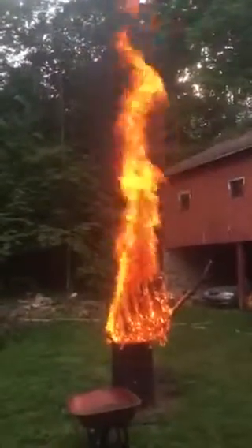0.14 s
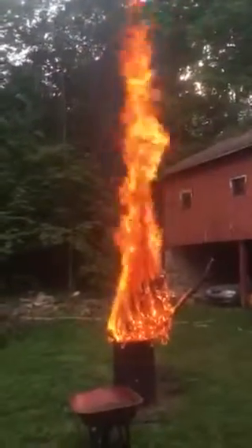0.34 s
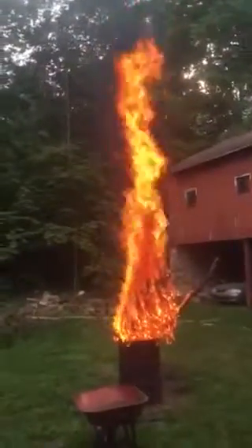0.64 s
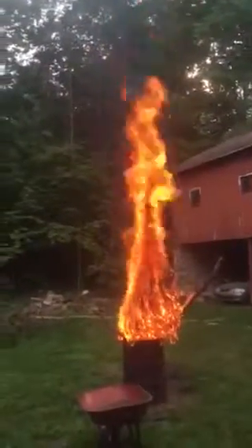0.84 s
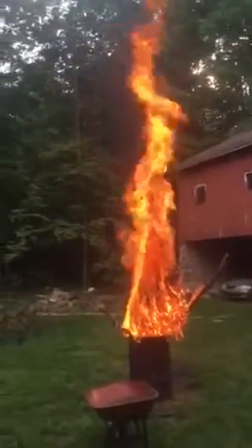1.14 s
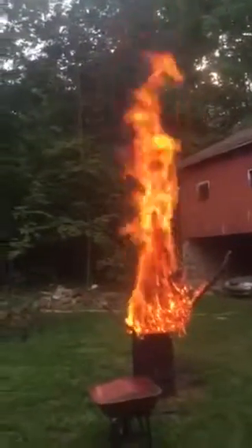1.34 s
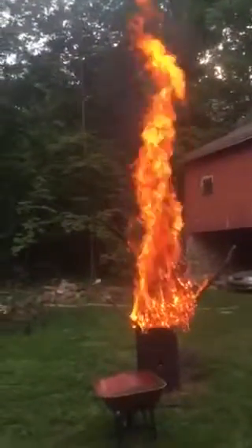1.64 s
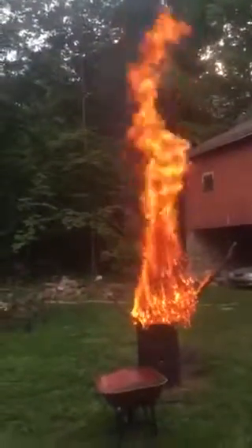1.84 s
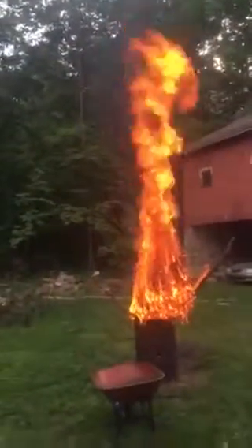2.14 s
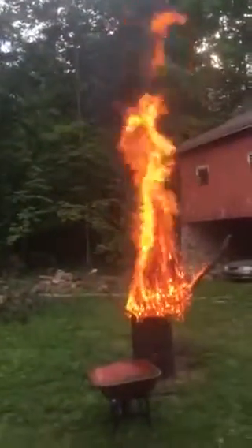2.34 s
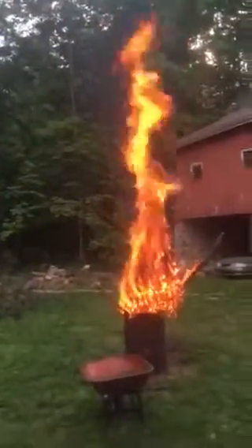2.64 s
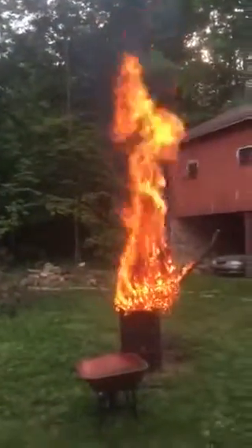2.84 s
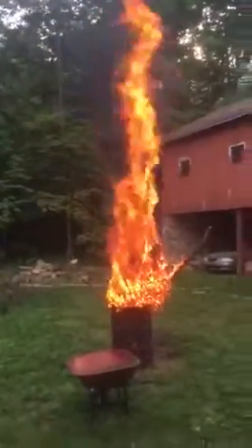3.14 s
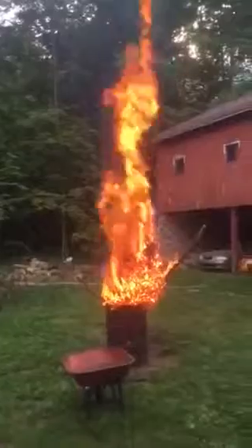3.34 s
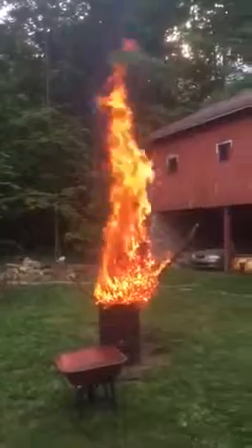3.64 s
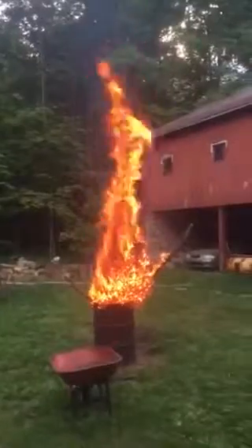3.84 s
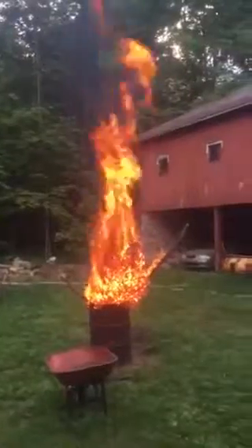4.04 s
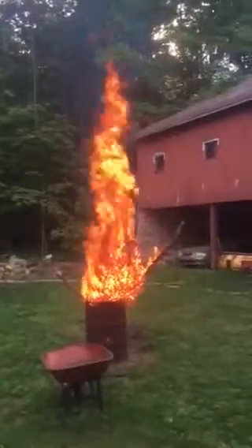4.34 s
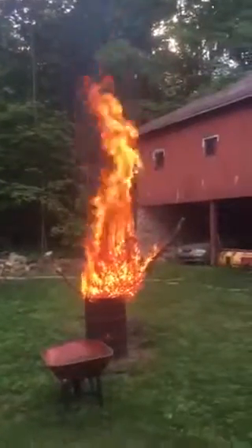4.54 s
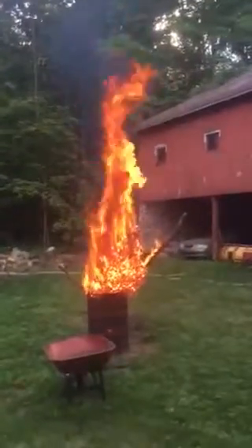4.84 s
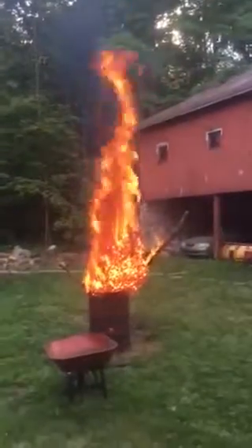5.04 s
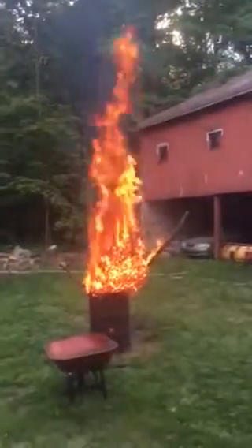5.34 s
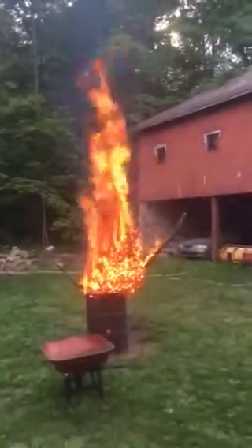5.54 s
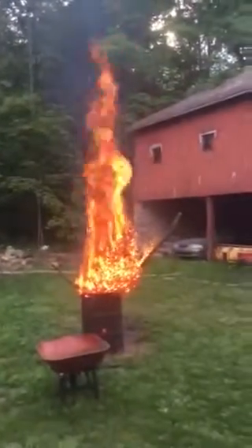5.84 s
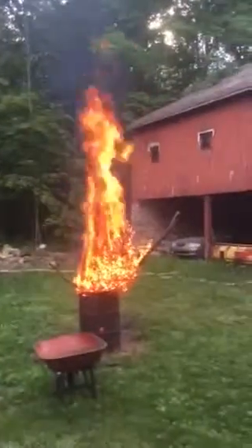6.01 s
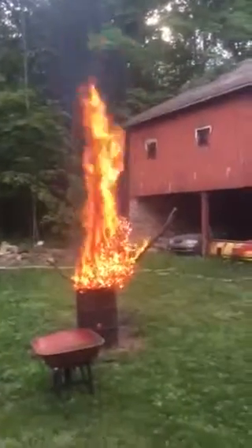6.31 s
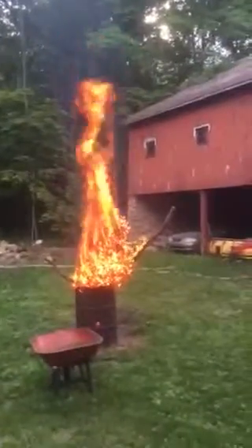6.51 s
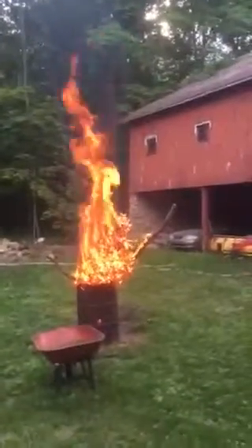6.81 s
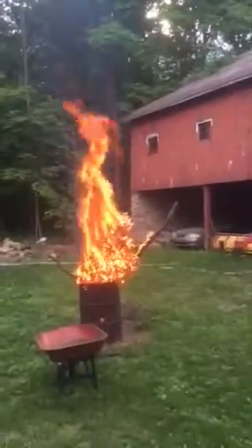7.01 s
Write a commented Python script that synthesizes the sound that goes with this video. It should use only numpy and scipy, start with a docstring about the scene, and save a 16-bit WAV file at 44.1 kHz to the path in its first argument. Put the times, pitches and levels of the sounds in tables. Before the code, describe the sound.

A tall blaze in a metal barrel outdoors, heard in mono from a few metres for about seven seconds. Dense, dry needle crackle and sputtering fizz run throughout, strongest around 0.4 s, swelling again near 1.3 and 3.3 s, thinner from 4 to 6 s, then surging near 6.5 and 7 s. Beneath is a quiet low roar with fluttering tongues and soft puffs. A dull wooden knock comes at 0.35 s, then a faint breathy whistle from 0.4 to 0.9 s. Sharp pops vary from low cracks to bright ticks: a hard double snap at 1.0 s, moderate ones at 1.44, 2.55 and 3.5 s, a cluster around 4.7 s. The loudest strike at 5.0, 5.37, 5.5, 5.7, 5.9, 6.43, 6.8 and 7.0 s. Some scatter splintery ticks; ground, barn and trees add brief, faint echoes.

```python
"""Sharp pops ring out first: twigs and resin pockets burst in a dry conifer burning in a steel barrel.
Under them countless needles crackle as tiny ticks and fizz as sputtering noise, while the tall flame
flutters with a low roar of shaped noise. A faint whistle of gas and a dull knock each come once.
The fire stands on a lawn some metres away, and ground, barn and trees throw its pops back."""
import sys
import numpy as np
from scipy import signal
from scipy.fft import rfft, irfft, next_fast_len
from scipy.io import wavfile
from scipy.ndimage import uniform_filter1d

SR = 44100
rng = np.random.default_rng(int(sys.argv[2]) if len(sys.argv) > 2 else 0)


def to_wav(s):
    """Save 16-bit WAV."""
    ch = np.atleast_2d(s).T  # columns
    pcm = np.round(np.clip(ch, -1, 1) * 32767)  # PCM
    wavfile.write(sys.argv[1], SR, pcm.astype(np.int16))


N = 316197
TIME = np.arange(N) / SR


def amp(db):
    """Turns decibels into a gain."""
    return 10 ** (np.asarray(db) / 20)


def unit(x):
    """Scales a sound to an rms (average strength) of one."""
    return x / np.sqrt(np.mean(x ** 2) + 1e-20)


def curve(rows, order=1):
    """Draws straight lines between the rows of a timed table, for one of its columns."""
    columns = np.transpose(rows)
    return np.interp(TIME, columns[0], columns[order])


def spectrum(points, hz):
    """Reads a table of (frequency [Hz], level [dB]) as gains, on a log-frequency axis."""
    f, db = np.transpose(points)
    return amp(np.interp(np.log(hz + 1), np.log(f + 1), db))


def add(mix, s, sound):
    """Mixes a sound in at a time in seconds."""
    part = mix[max(round(s * SR), 0):][:len(sound)]
    part += sound[:len(part)]


def noise(points):
    """Steady random noise whose strength at each frequency follows a table."""
    size = next_fast_len(N)
    white = rfft(rng.standard_normal(size))
    gains = spectrum(points, np.fft.rfftfreq(size, 1 / SR))
    return unit(irfft(white * gains, size)[:N])


def flutter(hz):
    """Smooth random ups and downs, with little motion faster than the given rate."""
    size = next_fast_len(N)
    f = np.fft.rfftfreq(size, 1 / SR)
    white = rfft(rng.standard_normal(size))
    return unit(irfft(white * np.exp(-(f / hz) ** 2), size)[:N])


def burst(hz, focus, size=256):
    """Pressure swing of unit energy from mid-window on: big pockets swing slowly, focused ones ring on."""
    u = 1j * np.fft.rfftfreq(size, 1 / SR) / hz + 1e-9
    response = (2 * u / (1 + u) ** 2) ** focus
    swing = np.fft.fftshift(irfft(response, size), -1)
    return swing / np.linalg.norm(swing, axis=-1, keepdims=True)


def ringing(swing, hz, ring_db=-4, width_hz=700):
    """The twig that bursts rings for a moment at its own pitch, which colours the pop."""
    r, angle = np.exp(-np.pi * width_hz / SR), 2 * np.pi * hz / SR
    resonance = signal.lfilter([1 - r], [1, -r * np.exp(1j * angle)], swing).real
    rung = swing + 2 * amp(ring_db) * resonance
    return rung / np.linalg.norm(rung)


def splinters(per_s, fade_s, size=1024):
    """Fibres tear after a burst: a dying train of small random ticks, of unit energy."""
    t = np.arange(size) / SR
    hits = rng.random(size) < per_s / SR
    ticks = rng.standard_normal(size) * hits * np.exp(-t / fade_s)
    return ticks / (np.linalg.norm(ticks) + 1e-9)


# Bounces off the lawn, the barrel and the barn: (typical delay [s], level [dB])
BOUNCES = [(.0018, -6.5), (.0061, -14), (0.029, -27)]


def pops(rows, level_db=0.68, tear_db=-8, ring_octaves=0.53, bounce_hz=5000,
         push_db=-21, push_hz=1000, size=2048):
    """Each pop is a ringing snap with a low push of steam, a tear, splinters and duller bounces."""
    out = np.zeros(N)
    dull = np.exp(-2 * np.pi * bounce_hz * np.arange(32) / SR)  # softens the treble of a bounce
    for s, db, hz, focus, splinter_db in rows:
        ring_hz = hz * 2 ** (ring_octaves * rng.uniform(-1, 1))
        swing = ringing(burst(hz, focus), ring_hz)
        push_gain = amp(push_db) * min(3 * push_hz / hz, 1)  # high pops push less
        swing = swing + push_gain * burst(push_hz, focus=0.56)
        train = np.zeros(size)
        train[0] = 1
        add(train, .0001, amp(tear_db) * splinters(per_s=14000, fade_s=0.00021))
        snap = np.linalg.norm(np.convolve(train, swing))  # strength of snap and tear alone
        add(train, .0008, amp(splinter_db) * splinters(per_s=2500, fade_s=0.0039))
        for delay, bounce_db in BOUNCES:
            varied_delay = delay * (1 + .2 * rng.uniform(-1, 1))  # for its height in the tree
            add(train, varied_delay, amp(bounce_db) * dull / dull.sum())
        start = s - len(swing) / 2 / SR  # the swing begins in the middle of its window
        add(out, start, amp(db + level_db) * np.convolve(train, swing) / snap)
    return out


# One row for each loud pop; a low pitch means a big pocket, a high focus a narrow ring:
# (time [s], relative energy [dB], pitch [Hz], focus [no unit], splinters against the snap [dB])
LOUD_POPS = [(0.125, -18.5, 3900, 1.2, 6), (0.2815, -13, 6200, 0.62, 1), (0.3366, -18, 7350, 1.3, -14),
             (0.3881, -14.5, 3700, 2.8, -8), (0.4496, -19.5, 2900, .6, -6), (0.486, -24, 2700, 0.81, 7.5),
             (0.703, -17, 15000, 4.3, -19), (0.7292, -24, 4600, 0.4, -4), (0.7858, -20.5, 10300, 0.73, -1),
             (0.8435, -22.5, 2300, .5, -5), (1.004, -11.5, 4240, 1.4, 1), (1.0057, -5, 2900, 0.68, -24),
             (1.099, -24, 8340, 1.1, -4), (1.1573, -19.5, 9200, 1.7, 0), (1.2047, -28, 3200, 2.9, -3),
             (1.2394, -22, 2300, 1.2, -10), (1.2462, -12, 2750, 1.5, -13), (1.2768, -18.5, 2300, 1.1, -8),
             (1.4329, -16, 10400, 2.4, -11), (1.4416, -10.5, 4240, 1.5, -19), (1.5294, -19, 5300, 0.25, -3),
             (1.6059, -16.5, 4100, 0.95, -3), (1.675, -17.5, 3900, 1.2, -8), (1.8145, -24, 1500, 0.33, 6),
             (1.8385, -21, 4900, .5, -5), (1.908, -18.5, 9100, 0.65, 4.5), (1.93, -19, 3900, 1.7, -10),
             (1.9694, -15.5, 2700, 1.3, -12), (2.014, -23, 1530, 3.4, 0), (2.0473, -18, 2300, 0.72, 2),
             (2.314, -20, 15000, 0.34, -13), (2.3434, -27, 4600, 1.2, -10), (2.359, -15, 2780, 0.9, 0.5),
             (2.4134, -18.5, 7200, 0.59, -10), (2.487, -18, 11200, 0.42, -2), (2.5496, -11, 2350, 2, -11),
             (2.5615, -16, 2100, 1.2, 1), (2.5877, -16.5, 1600, 1.2, -2), (2.739, -18.5, 1310, 0.62, -7),
             (2.7967, -18.5, 3500, 0.6, 2.5), (2.8092, -17.5, 2520, .5, -3), (2.8334, -17, 1970, 1.4, 1.5),
             (2.8597, -20, 3900, 0.95, -7), (2.8873, -19, 2300, 1.6, -10), (2.898, -19.5, 6300, 0.41, -17),
             (2.9362, -24.5, 4300, 1.4, -10), (3.005, -15, 15100, 0.95, -17), (3.0435, -28, 7200, .5, -10),
             (3.1163, -17, 12100, 0.65, -8), (3.2048, -16, 2960, 0.85, -14),
             (3.2769, -13.5, 1930, 0.69, -4), (3.3269, -18, 9700, 0.55, -10), (3.389, -18, 6700, .5, -12),
             (3.4323, -16.5, 1920, 0.5, -26), (3.488, -12, 11200, 0.6, -16), (3.5286, -21, 4600, 1.2, -12),
             (3.5466, -10.5, 6360, 0.3, 0), (3.6225, -27, 3900, 0.43, -2), (3.636, -16.5, 15000, 1.4, -17),
             (3.687, -18.5, 3200, 0.55, -12), (3.737, -20.5, 4600, 0.59, -9),
             (3.7511, -18, 5500, 0.52, -13), (3.7646, -21.5, 2200, 0.93, -16),
             (3.7718, -16.5, 4400, 0.6, -16), (3.8298, -14, 2880, 1.4, -8), (3.8704, -24, 7200, 0.44, 2),
             (3.9962, -21.5, 2290, 2.4, -13), (4.0041, -12.5, 4400, 1.1, -30),
             (4.057, -15, 3300, 1.5, -3.5), (4.1953, -27, 3080, 3.3, 4), (4.249, -19, 5550, 0.81, 1.5),
             (4.304, -17, 2720, 1.3, -2.5), (4.422, -25, 4400, 1.5, -5), (4.4851, -28, 4900, 1.2, -17),
             (4.5686, -24.5, 1700, .5, -3), (4.652, -11.5, 3580, 1.8, -10), (4.6898, -19, 9700, .8, -10),
             (4.702, -15.5, 12100, 0.35, -18), (4.7205, -13, 3870, 0.95, 0.5),
             (4.729, -11, 4100, 0.96, -21), (4.765, -19, 7700, 0.7, -10), (4.8046, -20, 1300, 0.7, -3),
             (4.8967, -14.5, 7800, 0.8, -14), (4.937, -23.5, 3820, 1.4, 3.5), (4.9695, -8, 6640, 1.7, -10),
             (5.0004, -10.5, 3700, 0.4, -2), (5.06, -20, 7700, 1.4, -20), (5.1706, -12, 5150, 1.1, -10),
             (5.1944, -21, 13000, .5, -10), (5.288, -16.5, 9100, 0.94, -6),
             (5.3058, -20.5, 3500, 0.92, -10), (5.368, -3, 6450, 0.92, -12),
             (5.5046, -6.5, 4550, 1.64, -15), (5.579, -15.5, 6340, 2, -16), (5.6264, -20, 6700, 1.8, -12),
             (5.704, -4.5, 5300, 1.85, -14), (5.726, -7, 9500, 0.99, -16), (5.75, -16, 12100, 0.9, -12),
             (5.8092, -19, 4350, 1.7, -7), (5.8619, -15, 3800, 0.39, 0.5), (5.8889, -6, 3270, 2.35, -30),
             (5.9383, -23, 4300, 2.4, -10), (5.9711, -12.5, 3740, 1.7, -12),
             (6.0537, -21.5, 4820, 1.8, -10), (6.112, -24.5, 3900, 0.87, -8),
             (6.1767, -13.5, 2400, 1.2, -15), (6.3626, -24, 8300, 0.87, -8), (6.383, -20, 3400, 2, -10),
             (6.401, -17, 8400, 0.51, -9), (6.4309, -5, 14900, 0.52, 0.5), (6.4709, -15, 7800, 0.46, -13),
             (6.5187, -20.5, 3700, 1.7, -12), (6.612, -18, 5940, 5.3, -16), (6.6986, -16.5, 9700, 0.5, 1),
             (6.8064, -6, 10400, 1.06, -9), (6.8864, -27, 4600, 2.9, -3), (6.9161, -27, 4570, 2.3, -6),
             (6.9912, -9, 4430, 1.3, -29), (7.0116, -21.5, 4570, 2.2, -13)]


def loud_pops():
    """The loudest twigs and resin pockets burst at set times."""
    return pops(LOUD_POPS)


def first_cracks(lead_s=.009, weaker_db=-19, splinter_db=0, thick_hz=5200):
    """Thick, low-pitched wood cracks faintly just before it bursts: one row for each crack."""
    leads = lead_s * rng.uniform(.5, 1.5, len(LOUD_POPS))
    return [(s - lead, db + weaker_db, hz, focus, splinter_db)
            for (s, db, hz, focus, _), lead in zip(LOUD_POPS, leads) if hz < thick_hz]


# Lesser twigs: how often, then a rough middle and spread for each random quality
TWIGS_PER_S = 60
TWIG_HZ, TWIG_SPREAD_OCTAVES = 7340, 0.78
TWIG_SPLINTER_DB, TWIG_SPLINTER_SPREAD_DB = -14, 5.5
TWIG_FOCUS, TWIG_SPREAD_FOCUS = 1.54, 0.44  # the spread acts as a power of e
TWIG_DB, TWIG_SPREAD_DB, TWIG_FOLLOWS = -26.5, 2.5, 0.38  # the last: dB per dB of blaze
USUAL_BLAZE_DB = -52


def twigs(blaze_db):
    """Lesser twigs pop at random, louder in a fierce blaze; snap and splinters share the energy."""
    count = round(TWIGS_PER_S * N / SR)
    s = rng.random(count) * TIME[-1]
    strength, pitch, ring, split = np.sqrt(3) * rng.uniform(-1.12, 1, (count, 4)).T
    blaze_lift_db = np.interp(s, TIME, blaze_db) - USUAL_BLAZE_DB
    db = TWIG_DB + TWIG_FOLLOWS * blaze_lift_db + TWIG_SPREAD_DB * strength
    hz = TWIG_HZ * 2 ** (TWIG_SPREAD_OCTAVES * pitch)
    focus = TWIG_FOCUS * np.exp(TWIG_SPREAD_FOCUS * ring)
    splinter_db = TWIG_SPLINTER_DB + TWIG_SPLINTER_SPREAD_DB * split
    snap_db = db - 10 * np.log10(1 + amp(splinter_db) ** 2)
    return list(zip(s, snap_db, hz, focus, splinter_db))


# How fiercely the needles burn, before flares and surges: (time [s], level [dB])
NEEDLE_BLAZE = [(0, -49.5), (.42, -46), (.6, -56), (.75, -52.5), (1.1, -53), (1.28, -48), (1.5, -53),
                (2.2, -52), (3.0, -52.5), (3.3, -49.5), (3.78, -53.5), (3.97, -56.5), (4.1, -59),
                (4.35, -54), (4.6, -59.5), (5.2, -57.5), (5.65, -53), (5.95, -58.5), (6.25, -52.5),
                (6.5, -48), (6.7, -55.5), (6.9, -53), (7.05, -47.5), (7.17, -65)]


def needle_blaze():
    """The slow rise and fall of the burning needles, in dB."""
    return curve(NEEDLE_BLAZE)


FLARE_DB, FLARE_RISE_S, FLARE_FALL_S = 2.5, 0.016, 0.027


def flares():
    """Needles flare up around each loud pop, in dB: a quick build-up, a slower dying away."""
    nearest = np.full(N, np.inf)
    for s, *_ in LOUD_POPS:
        distance = np.maximum((s - TIME) / FLARE_RISE_S, (TIME - s) / FLARE_FALL_S)
        nearest = np.minimum(nearest, distance)
    return FLARE_DB * np.exp(-nearest)


def crackle(blaze_db, bright_db, level_db=26.0, range_db=29, steep=0.62, ceiling_db=-28.0,
            low_hz=1600, high_hz=15000, focus=2.07, bounce_db=-4, count=6500):
    """Needles burst at random, each at its own pitch; the smaller the tick, the more often it comes."""
    when, rank, fineness, ring, height = rng.random((count, 5)).T
    at = (when * N).astype(int)
    flurry_db = 2.5 * flutter(hz=40)  # ticks swell and fade in flurries
    db = level_db + (blaze_db + flurry_db)[at] + (2 * fineness - 1) * bright_db[at]
    strength = amp(db) * (1 + rank * amp(range_db)) ** -steep
    ceiling = amp(ceiling_db)
    strength = ceiling * np.tanh(strength / ceiling)  # a needle holds only so much steam
    hz = low_hz * (high_hz / low_hz) ** fineness
    tick_focus = focus * np.exp(2 * ring[:, None] - 1)
    ticks = strength[:, None] * burst(hz[:, None], tick_focus, size=64)
    place = at[:, None] + np.arange(ticks.shape[1])
    # the lawn's echo depends on the needle's height
    bounce = ((.0012 + .002 * height[:, None]) * SR).astype(int)
    direct, echo = (np.bincount(p.ravel(), ticks.ravel(), N)[:N] for p in (place, place + bounce))
    return direct + amp(bounce_db) * echo


# Steam and sap fizzing out of the needles: (frequency [Hz], relative level [dB per Hz])
FIZZ_SPECTRUM = [(400, 9.5), (1200, -22), (2500, -17), (4000, 8), (9000, -7), (16000, 14.5)]


def fizz(blaze_db, bright_db, fizz_db=-10.0, fizz_bright=1.0):
    """Steam and sap hiss out of the needles: noise that sputters and follows the blaze."""
    sputter_db = 3 * flutter(hz=60) + 3 * flutter(hz=900)
    hiss = unit(noise(FIZZ_SPECTRUM) * amp(sputter_db))
    return hiss * amp(blaze_db + fizz_db + fizz_bright * bright_db)


# The colour shared by pops, crackle and fizz: (frequency [Hz], gain [dB])
SHARED_COLOUR = [(150, -18.5), (620, 1), (820, -4), (1100, -1.5), (1280, 0.5), (1750, -1), (2200, 0),
                 (2650, -0.6), (2950, -1.5), (3400, -0.5), (4400, 0.5), (4900, -3), (5500, -1), (6100, -1),
                 (7600, -1), (8600, 3), (9500, 2), (10450, -3), (11000, 1.5), (16000, -3.5)]


def coloured(x, size=2048):
    """Filters without looking ahead, so that the peaks of the colour ring briefly after each click."""
    log_gain = np.log(spectrum(SHARED_COLOUR, abs(np.fft.fftfreq(size, 1 / SR))))
    taps = np.fft.ifft(np.exp(np.conj(signal.hilbert(log_gain)))).real
    return signal.oaconvolve(x, taps[:size // 2])[:N]


def yard(x, near_db=-12.0, near_t60=0.097, far_db=-17.5, far_t60=0.5, count=8, size=16384):
    """Barrel and ground scatter sound briefly, trees for longer; each spot in the fire has its own paths."""
    t = np.arange(size) / SR
    spot = rng.integers(0, count, N // 256 + 1).repeat(256)[:N]  # which spot sounds at each moment
    out = x.copy()
    for k in range(count):
        tail = np.zeros(size)
        for db, t60 in ((near_db, near_t60), (far_db, far_t60)):  # t60: seconds to fall by 60 dB
            hits = (rng.random(size) < .1) * (t > .001)
            taps = rng.standard_normal(size) * hits * amp(-60 * t / t60)
            tail += amp(db) * taps / np.linalg.norm(taps)
        share = uniform_filter1d(1. * (spot == k), size=64)  # soft switching between spots
        out += signal.oaconvolve(x * share, tail)[:N]
    return out


# Big tongues of flame break away with a soft puff: (time [s], lift of roar and tongues [dB])
BREAKAWAYS = [(.585, 4.5), (.66, 4), (2.02, 3), (2.09, 4), (2.4, 3), (2.75, 4), (5.22, 3.5), (5.32, 3),
              (5.45, 3), (5.55, 5), (5.79, 6.5), (6.36, 6)]
BILLOW_S = 0.019


def billows():
    """Brief swells of the flame, in dB."""
    return sum(db * np.exp(-((TIME - s) / BILLOW_S) ** 2) for s, db in BREAKAWAYS)


def eddies(x, depth_db, size=2048):
    """Each eddy lifts or drops a narrow band of the sound for some hundredths of a second."""
    overlap = size * 3 // 4
    z = signal.stft(x, nperseg=size, noverlap=overlap)[2]
    patches = uniform_filter1d(rng.standard_normal(z.shape), size=4, axis=0)
    patches = unit(uniform_filter1d(patches, size=5, axis=1))
    shaped = z * amp(depth_db * np.clip(patches, -2, 2))
    return unit(signal.istft(shaped, nperseg=size, noverlap=overlap)[1][:N])


# The flame's low roar: (frequency [Hz], relative level [dB per Hz])
ROAR_SPECTRUM = [(20, -27), (30, -20), (42, -6), (65, 1.5), (92, -3.5), (108, -1), (120, -2), (135, 0.5),
                 (152, -3.5), (172, -4.5), (230, -17.5), (400, -32), (2000, -79)]


def roar(puff_db, roar_draught_db, roar_db=1.3, lump_db=1.25):
    """The turbulent column roars low, with puffs and faster lumps."""
    lumpy = unit(noise(ROAR_SPECTRUM) * amp(puff_db + lump_db * flutter(hz=23.0)))
    return lumpy * amp(roar_draught_db + roar_db)


# Flapping tongues of flame: (frequency [Hz], relative level [dB per Hz])
TONGUE_SPECTRUM = [(60, -43), (150, -4), (210, 1.5), (255, 1), (295, -3), (335, -2), (450, -9.5),
                   (650, -28), (2500, -52)]


def tongues(puff_db, draught_db, tongues_db=0.63, flap_db=1.5):
    """Tongues of flame flap: noise broken up by eddies, puffs and quick flutter."""
    flapping = eddies(noise(TONGUE_SPECTRUM), depth_db=4)
    flapping = unit(flapping * amp(puff_db + flap_db * flutter(hz=22.3)))
    return flapping * amp(draught_db + tongues_db)


# The soft rush of hot gas and open air: (frequency [Hz], relative level [dB per Hz])
RUSH_SPECTRUM = [(200, -12), (440, -7.5), (520, 1), (570, 0), (640, 3.5), (800, -2), (1000, -2.5),
                 (1400, -10), (2500, -10), (6000, -11), (16000, -19)]
# RUSH_DB holds at the usual draught; RUSH_FOLLOWS is in dB per dB of draught
USUAL_DRAUGHT_DB, RUSH_DB, RUSH_FOLLOWS = -62, -61, 0.34


def rush(draught_db, waver_db=2.8):
    """Hot gas rushes in eddies and wavers, partly following the draught."""
    swirling = eddies(noise(RUSH_SPECTRUM), depth_db=3)
    follow_db = RUSH_FOLLOWS * (draught_db - USUAL_DRAUGHT_DB)
    return swirling * amp(RUSH_DB + follow_db + waver_db * flutter(hz=21))


# Draught up the flame column, before a small lift of each layer:
# (time [s], level of the flapping tongues [dB], level of the low roar [dB])
COLUMN_DRAUGHT = [(0, -57.5, -48.5), (.3, -59, -52), (.6, -58, -50), (1.0, -59.5, -51), (1.4, -57.5, -51.5),
                  (1.85, -60, -52.5), (2.35, -60.5, -54.5), (2.8, -61, -51.5), (3.0, -65.5, -53),
                  (3.4, -60, -49.5), (3.85, -63, -55), (4.1, -63.5, -52), (4.8, -66, -52.5),
                  (5.0, -62.5, -52), (5.4, -60.5, -52.5), (5.7, -63, -52.5), (6.2, -59.5, -53.5),
                  (6.4, -62, -52.5), (7.17, -67.5, -51.5)]
PUFF_HZ, PUFF_DB = 7.2, 0.85  # the column puffs a few times a second


def flame():
    """Roar and tongues puff together, and hot gas rushes past, all with the draught."""
    draught_db = curve(COLUMN_DRAUGHT)
    roar_draught_db = curve(COLUMN_DRAUGHT, order=2)
    puff_db = PUFF_DB * flutter(hz=PUFF_HZ) + billows()
    return roar(puff_db, roar_draught_db) + tongues(puff_db, draught_db) + rush(draught_db)


# A faint, breathy whistle of gas leaving the wood: (frequency [Hz], relative level [dB per Hz])
JET_SPECTRUM = [(700, -23), (1200, 1), (1360, 6), (1560, -6), (1750, -14), (3000, -40)]
# it blows once: start, swell, hold and dying away in seconds, then its level
JET_S, JET_RISE_S, JET_HOLD_S, JET_FALL_S, JET_DB = 0.41, .04, 0.28, .14, -65


def jet():
    """Gas leaves the wood in one brief, faint whistle of narrow noise."""
    corners = JET_S + np.cumsum([0, JET_RISE_S, JET_HOLD_S, JET_FALL_S])
    swell = np.interp(TIME, corners, [0, 1, 1, 0])
    return noise(JET_SPECTRUM) * amp(JET_DB) * swell


# T60 is the time in seconds to fall by 60 dB
THUMP_S, THUMP_HZ, THUMP_T60, THUMP_DB = .346, 520, .07, -39.5


def thump(rise_s=.005, upper=1.2, size=8192):
    """A piece of wood drops in the barrel: a dull knock of two close tones that die quickly."""
    t, out = np.arange(size) / SR, np.zeros(N)
    modes = (np.sin(2 * np.pi * THUMP_HZ * t) + np.sin(2 * np.pi * THUMP_HZ * upper * t)) / 2
    fade = amp(THUMP_DB - 60 * t / THUMP_T60)
    add(out, THUMP_S, modes * np.minimum(t / rise_s, 1) * fade)
    return out


# Fine needles over thicker twigs: a weaker blaze leaves mostly the fine ones
BRIGHT_DB, BRIGHT_PER_DB = 1.5, -0.3  # at the usual blaze; change per dB of blaze


def scene(surge_db=0.65, surge_hz=12, shimmer_db=3):
    """Pops, crackle and fizz echo in the yard, over the flame, the whistle and the knock."""
    steady_blaze_db = needle_blaze()
    blaze_db = steady_blaze_db + flares() + surge_db * flutter(hz=surge_hz)
    bright_db = BRIGHT_DB + BRIGHT_PER_DB * (blaze_db - USUAL_BLAZE_DB)
    bright_db = bright_db + shimmer_db * flutter(hz=surge_hz)  # the treble flickers
    bursts = loud_pops() + pops(first_cracks()) + pops(twigs(steady_blaze_db))
    fire = coloured(bursts + crackle(blaze_db, bright_db) + fizz(blaze_db, bright_db))
    return (yard(fire) + flame() + jet() + thump())[None]


EDGE_HZ = 15950


def record(dry):
    """The recorder's band limit: a steep filter takes off the highest treble."""
    taps = signal.firwin(401, EDGE_HZ, window=("kaiser", 8), fs=SR)
    return signal.oaconvolve(dry, taps[None], "same")


dry = scene()
out = record(dry)
to_wav(out)
```